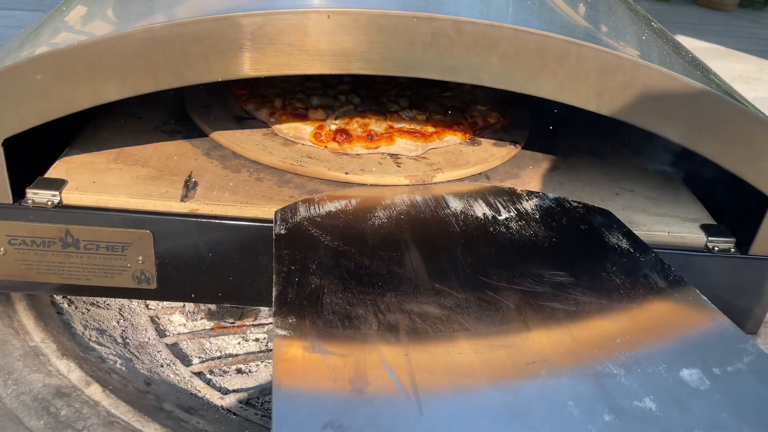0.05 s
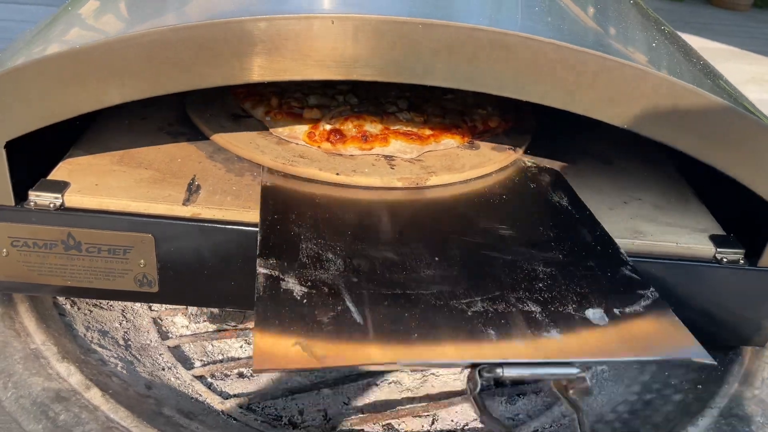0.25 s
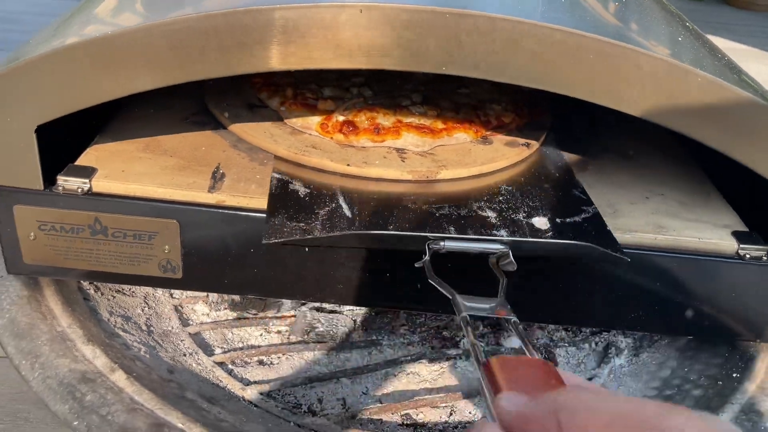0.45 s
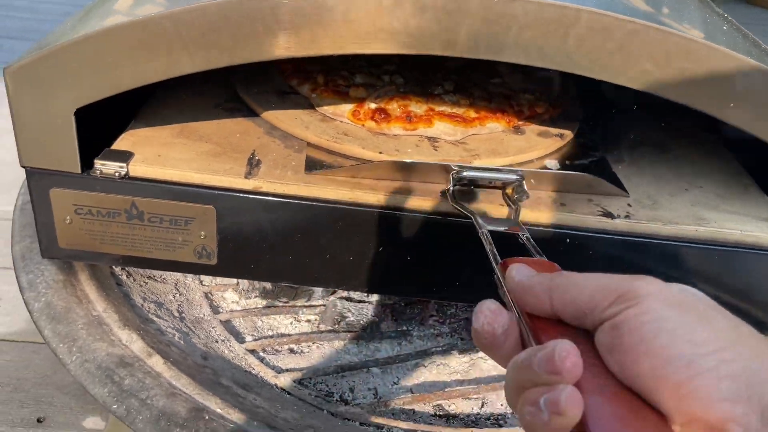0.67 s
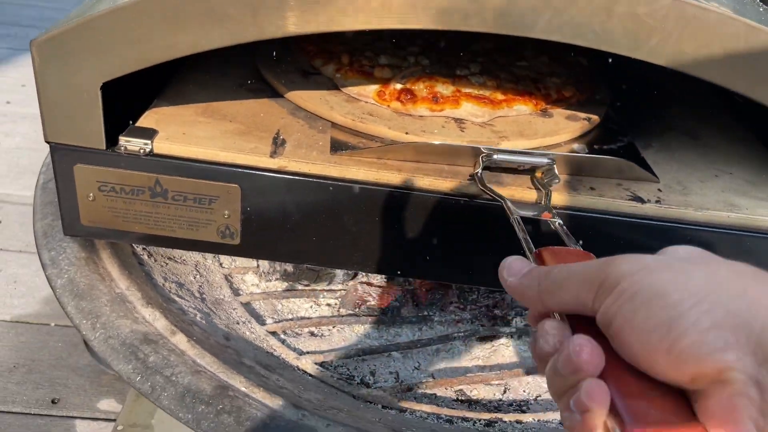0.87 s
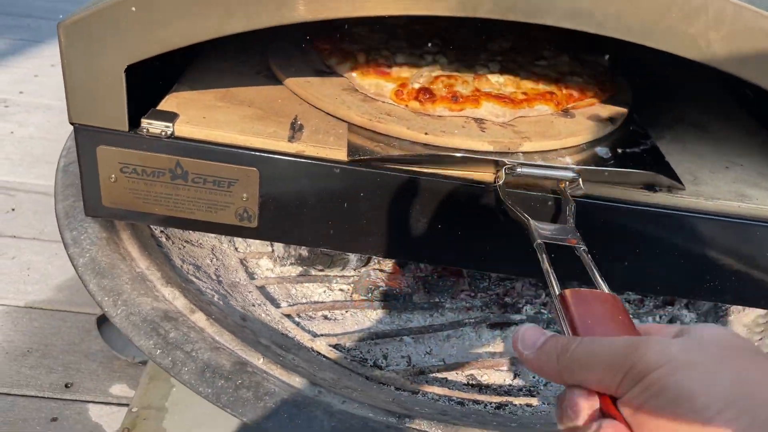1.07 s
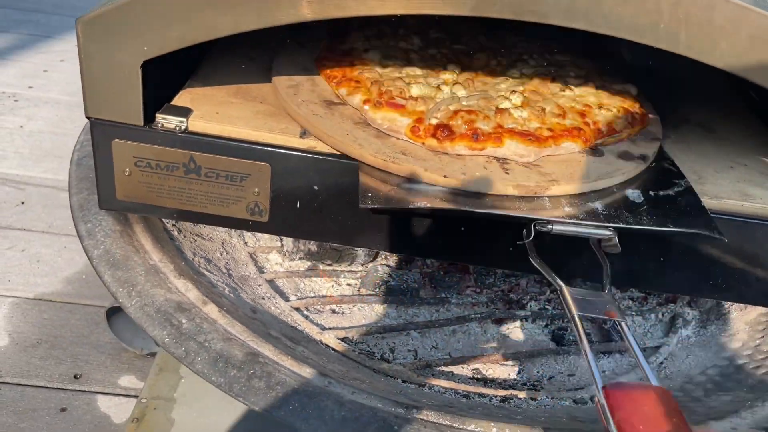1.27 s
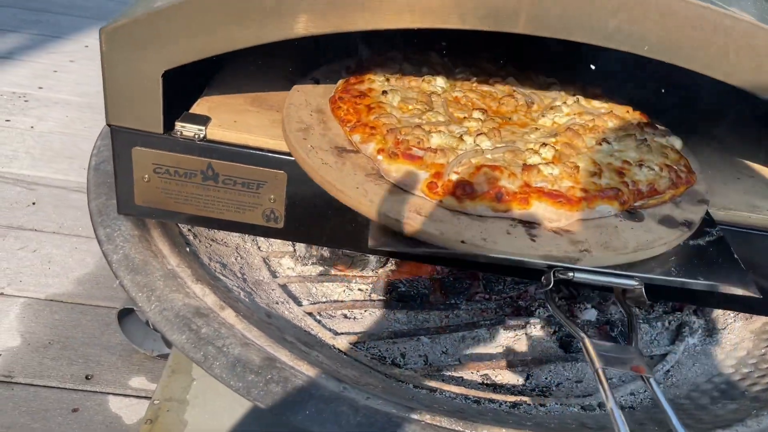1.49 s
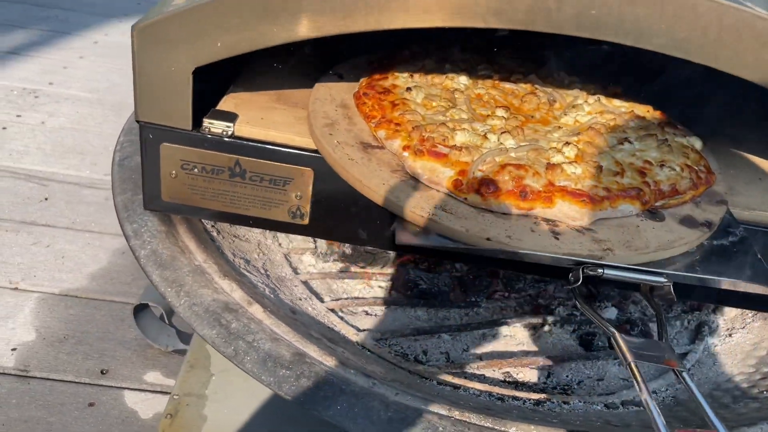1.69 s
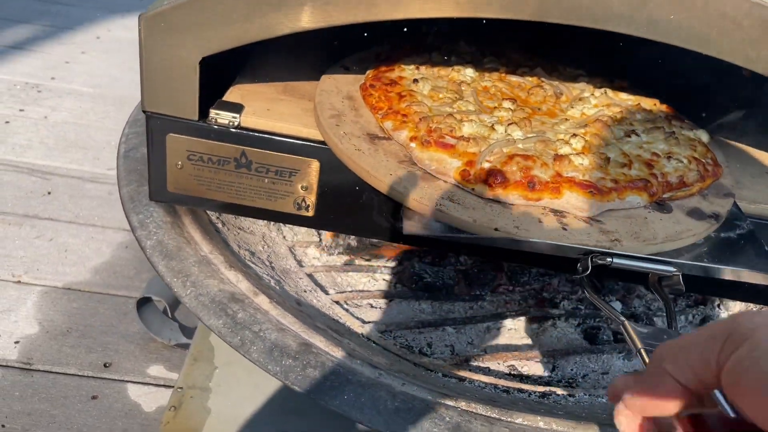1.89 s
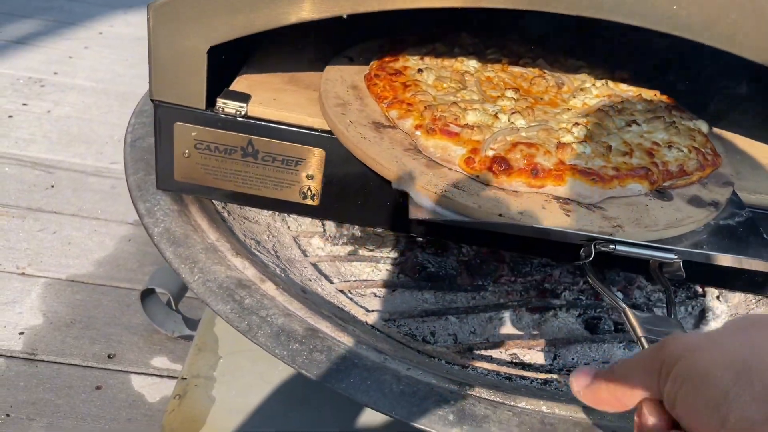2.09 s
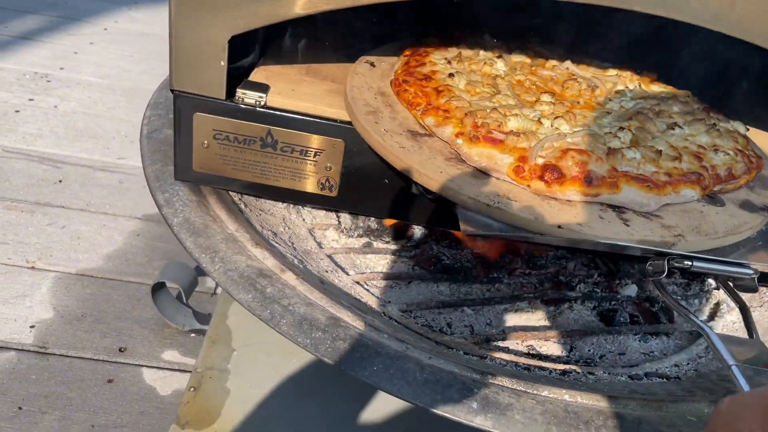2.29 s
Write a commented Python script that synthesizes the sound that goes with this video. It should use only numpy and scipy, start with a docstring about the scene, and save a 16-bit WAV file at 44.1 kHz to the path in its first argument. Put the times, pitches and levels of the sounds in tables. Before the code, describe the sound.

A metal peel scrapes into a pizza oven, close up, with a gritty hiss and brief squeaks. It bumps and judders on the oven floor around 0.5 seconds, then scrapes and squeaks again from 0.8 to 1.5. A sharp knock on the stone at 1.5 leaves the steel ringing faintly. A bright click comes at 1.9, then softer scraping and a small tap at 2.3. Burner and breeze rumble underneath.

```python
"""Pizza peel in a steel oven

A metal peel slides in under a pizza stone, outdoors and close up. Its blade hisses over grit, squeaks
as it catches, judders against the oven floor, knocks the stone and clicks once more. The steel shell
rings on over the low rumble of the burner and a light breeze."""
import sys
import numpy as np
from scipy import signal
from scipy.fft import rfft, irfft
from scipy.io import wavfile

SR = 44100
rng = np.random.default_rng(int(sys.argv[2]) if len(sys.argv) > 2 else 0)


def unload_wav(signal):
    """Save mono or channel-first audio to the path in sys.argv[1] as 16-bit WAV at rate SR, clipped to [-1, 1]."""
    wavfile.write(
        sys.argv[1],
        SR,
        np.round(np.clip(np.atleast_2d(signal).T, -1, 1) * 32767).astype(np.int16),
    )


N = 108045
T = np.arange(N) / SR
HZ = np.maximum(np.arange(N + 1) * SR / (2 * N), 1)

# Resonances of the oven body and of the blade. Each row: centre in Hz, width in Hz, prominence in dB.
BODY_PEAKS = [(113.4, 26, 7.6), (190.3, 3, 9.7), (258.4, 12.3, 9.25)]
BLADE_PEAKS = [(825, 34, 9.5), (1399, 63, 5.5), (1650, 31, 2.5), (1930, 36, -11), (3570, 63, -3)]
# Colour of the rattling steel shell. Each row: frequency in Hz, relative level in dB.
RATTLE_COLOUR = [(300, -8), (550, -0.5), (850, -2), (1600, -6.5), (1950, -20), (6000, -75)]


def undb(db):
    """Decibels to gain."""
    return 10 ** (np.asarray(db) / 20)


def unit(x):
    """Scale to rms 1."""
    return x / np.sqrt(np.mean(x ** 2))


def response(colour, peaks=()):
    """Gain over frequency, at rms 1: a broad colour with resonances on top."""
    hz, db = np.array(colour).T
    broad = undb(np.interp(np.log(HZ), np.log(hz), db))
    resonance = sum(undb(lift) ** 2 / (1 + (2 * (HZ - centre) / width) ** 2)
                    for centre, width, lift in peaks)
    return unit(broad * np.sqrt(1 + resonance))


def through(x, gain):
    """Minimum-phase filter with the given gain over frequency."""
    cepstrum = irfft(np.log(gain + 1e-9))
    cepstrum[1:N] *= 2
    cepstrum[N + 1:] = 0
    taps = irfft(np.exp(rfft(cepstrum)))[:N // 8]
    return signal.fftconvolve(x, taps[None], axes=1)[:, :N]


def walk(per_s):
    """A random drift with a spread near 1."""
    knots = rng.standard_normal(2048)
    return np.interp(T * per_s, np.arange(len(knots)), knots)


def spread(pair, side_db):
    """Stereo from two unrelated signals, used as mid and side."""
    return pair[0] + undb(side_db) * pair[1] * np.array([[1], [-1]])


def grains(per_s, scatter_db):
    """Two streams of tiny slips of random size."""
    hits = rng.random((2, N)) < per_s / SR
    signs = np.sign(rng.standard_normal((2, N)))
    return unit(hits * signs * undb(scatter_db * rng.standard_normal((2, N))))


def burst(t60, side_db):
    """Noise that dies away by 60 dB in t60 seconds."""
    return spread(grains(SR, scatter_db=1), side_db) * undb(-60 * T / t60)


def ring(modes):
    """Struck modes, alternating in sign."""
    return sum((-1) ** k * undb(db - 60 * T / t60) * np.sin(2 * np.pi * hz * T)
               for k, (hz, db, t60) in enumerate(modes))


def arch(length):
    """A half-sine swell lasting length seconds."""
    return np.sin(np.pi * np.minimum(T / length, 1))


def at(x, start):
    """Delay a sound to its start in seconds."""
    return np.pad(np.atleast_2d(x), ((0, 0), (int(start * SR), 0)))[:, :N]


def plate(spacing_hz, ripple_db):
    """The many close modes of sheet metal, as a ripple over frequency."""
    heights = rng.standard_normal(4096)
    return undb(ripple_db * np.interp(HZ / spacing_hz, np.arange(len(heights)), heights))


def strokes(rows, attack_s, release_s, rest_db):
    """One envelope per level column: strokes rise, hold and let go over the blade's resting contact."""
    power = undb(rest_db)[:, None] ** 2
    for start, length, *levels_db in rows:
        rise = (1 + np.tanh((T - start) / (2 * attack_s))) / 2
        fall = (1 + np.tanh((start + length - T) / (2 * release_s))) / 2
        power = power + (undb(levels_db)[:, None] * rise * fall) ** 2
    return np.sqrt(power)


def moving_contact(grit, gain, sets=7, shifts_per_s=16, contrast_db=12):
    """As the contact point travels over the blade, one set of its modes gives way to another."""
    shares = np.array([undb(contrast_db * walk(shifts_per_s)) for _ in range(sets)])
    shares = shares / np.sqrt(np.sum(shares ** 2, axis=0))
    blend = 0
    for k, share in enumerate(shares):
        modes = gain * plate(spacing_hz=55, ripple_db=4.5)
        slips = np.roll(grit, k * N // sets, axis=1)
        blend = blend + share * unit(through(slips, modes))
    return blend


def burner_and_breeze():
    """The burner rumbles in the oven body; a breeze brushes the microphone and dies down."""
    # Colours of the flame and the wind. Each row: frequency in Hz, relative level in dB.
    burner_colour = [(20, -29.5), (55, 1), (110, -7), (270, -9), (420, -15.5), (2000, -34.5), (16000, -104)]
    breeze_colour = [(20, -16), (55, 0), (100, -7), (1000, -70)]
    flame = spread(rng.standard_normal((2, N)), side_db=-10)
    air = spread(rng.standard_normal((2, N)), side_db=-8)
    burner = unit(through(flame, response(burner_colour, BODY_PEAKS)))
    breeze = unit(through(air, response(breeze_colour)))
    gust = undb(-41.5 - 6 * T + 2 * walk(per_s=9))  # falls 6 dB a second
    flicker = undb(-46.5 + walk(per_s=10.22))
    lull = undb(-9.5 * np.exp(-((T - 1.09) / 0.052) ** 2))  # the rumble dips briefly
    return lull * (flicker * burner + gust * breeze)


def bumps():
    """Soft pushes of the peel, a few low cycles each."""
    # Dull bumps. Each row: start in seconds, pitch in Hz, level in dB, length in seconds.
    pushes = [(0.221, 57, -33, 0.078), (0.286, 88.4, -37.5, 0.11), (0.467, 115.7, -18.5, 0.036),
              (1.237, 88.8, -25, 0.0205)]
    return sum(at(undb(db) * arch(length) * np.sin(2 * np.pi * hz * T), start)
               for start, hz, db, length in pushes)


def squeals():
    """Friction locks briefly onto one mode of the metal: a rough, wavering tone that sags."""
    # The blade's squeaks and groans. Each row: start and length in seconds, pitch in Hz, level in dB.
    catches = [(.15, 0.14, 888, -43.5), (0.225, 0.033, 1930, -40), (.275, 0.031, 2350, -41),
               (.55, 0.05, 297.6, -31), (0.783, 0.095, 1383, -45.5), (0.783, 0.078, 358.5, -39.5),
               (.925, 0.15, 825, -46.5), (1.052, 0.13, 870, -43.5), (1.152, .03, 2177, -42.5),
               (1.218, 0.034, 2710, -39), (1.223, 0.031, 1770, -44), (1.273, 0.057, 1650, -45),
               (1.371, .025, 1604, -42.5), (1.72, 0.099, 195.7, -38.5)]
    sag_per_s, waver_share, waver_cap_hz = 0.344, 0.045, 50
    tones = 0
    for start, length, hz, db in catches:
        waver = min(waver_share * hz, waver_cap_hz) * walk(per_s=303)
        pitch = hz * (1 - sag_per_s * (np.minimum(T, length) - length / 2)) + waver
        swell = arch(length) * undb(db + 2.9 * walk(per_s=131.4))
        tones = tones + at(swell * np.sin(2 * np.pi * np.cumsum(pitch) / SR), start)
    return tones


def clicks():
    """The blade's edge taps down: a hollow knock and a bright snap, echoing faintly in the oven mouth."""
    # Taps of the edge. Each row: start in seconds, then knock gain and snap gain in dB.
    taps = [(0.4614, -20.5, -33), (1.8863, -27.5, -9), (1.8973, -39, -25)]
    # Modes of the tapped blade. Each row: pitch in Hz, relative level in dB, T60 in seconds.
    edge_modes = [(253, -2, 0.076), (627, -1.5, 0.021), (1093, 0.5, 0.023)]
    # Colour of the snap. Each row: frequency in Hz, relative level in dB.
    snap_colour = [(70, -11), (250, 7.5), (1100, -3.5), (1700, -22.5), (4200, -13), (16000, -18.5)]
    spike = undb(17) * (T == 0)
    tail = 0.5 * burst(t60=0.028, side_db=-27)
    echo = undb(-25.5) * burst(t60=0.2, side_db=0)
    snap = through(spike + tail + echo, response(snap_colour)) * undb(-9)
    return sum(at(undb(knock_db) * ring(edge_modes) + undb(snap_db) * snap, start)
               for start, knock_db, snap_db in taps)


def knocks():
    """Each knock cracks, rings the stone briefly and leaves the steel shell ringing."""
    # The peel hits the stone. Each row: start in seconds, then gains of stone, crack and shell in dB.
    hits = [(1.466, -24.5, -3, -78), (1.4683, -11.5, -11.5, -40), (2.323, -47.5, -22, -80)]
    # Short modes of peel on stone, long modes of the shell.
    # Each row: pitch in Hz, relative level in dB, T60 in seconds.
    stone_modes = [(195, -6, 0.099), (387, -6.5, 0.11), (929, -2.5, 0.045), (1185, -10.5, 0.028),
                   (1580, -7.5, 0.039), (1995, -10.5, 0.078), (4565, -14, 0.049), (6580, -20.5, 0.04)]
    shell_modes = [(118.2, -1, 1.6), (188, -3.5, 4.1), (272.2, -8, 2.9), (364.5, -5.5, 1.6),
                   (508, -2.5, 1.07), (581, -3, 0.81), (803, -9, 1.6), (1029, -4.5, 1.3), (1339, -7.5, 1.5)]
    # Colour of the crack. Each row: frequency in Hz, relative level in dB.
    crack_colour = [(80, -22), (200, 4), (1500, 5.5), (4600, -6), (6500, -13), (15000, -24.5)]
    stone = ring(stone_modes)
    crack = through(burst(t60=0.057, side_db=-12), response(crack_colour)) * undb(-14)
    wash = through(burst(t60=1, side_db=-4.5), response(RATTLE_COLOUR)) * undb(3)
    shell = ring(shell_modes) + wash
    return sum(at(undb(stone_db) * stone + undb(crack_db) * crack + undb(shell_db) * shell, start)
               for start, stone_db, crack_db, shell_db in hits)


def drag():
    """The blade sticks and slips on the oven floor, shaking the body and rattling the shell."""
    # Drags on the floor. Each row: start and length in seconds, then judder and rattle gains in dB.
    drags = [(.39, 0.1, -37, -47), (.432, 0.046, -31, -31), (.464, 0.019, -22.5, -32.5),
             (.5, 0.18, -39, -44), (.552, 0.029, -29.5, -53), (.79, 0.089, -48, -44),
             (1.09, 0.073, -44.5, -50), (1.72, 0.21, -49, -56)]
    # Colour of the low judder. Each row: frequency in Hz, relative level in dB.
    judder_colour = [(60, -16), (130, -0.5), (270, -1), (600, -8.5), (1500, -44)]
    slips = grains(per_s=700, scatter_db=2)
    judder_force, rattle_force = strokes(drags, attack_s=0.0043, release_s=0.024, rest_db=(-60, -60))
    sheet = unit(response(RATTLE_COLOUR, BLADE_PEAKS) * plate(spacing_hz=18, ripple_db=5))
    judder = through(spread(slips, side_db=-14) * judder_force, response(judder_colour, BODY_PEAKS))
    rattle = through(spread(slips, side_db=-5) * rattle_force, sheet)
    return judder * undb(4) + rattle * undb(-0.5)


def slide():
    """Grit slips under the moving blade and rings it, while the hand's pressure wavers."""
    # The blade pushes in, draws the stone out and settles.
    # Each row: start and length in seconds, then grind and hiss gains in dB.
    slides = [(.04, 0.063, -58.5, -61), (.105, 0.19, -47.5, -52), (.19, 0.21, -40.5, -51),
              (.38, 0.16, -44, -58.5), (.535, 0.075, -44, -54.5), (.61, 0.032, -49, -65),
              (.93, 0.4, -51, -63.5), (1.02, 0.13, -46.5, -59), (1.15, 0.11, -47.5, -51),
              (1.218, 0.036, -43, -54), (1.275, 0.14, -44, -49), (1.41, 0.13, -45, -57),
              (1.52, .11, -52, -70), (1.91, 0.081, -57, -64), (2.11, 1, -52, -60.5)]
    # Colours of the coarse grind and the fine hiss. Each row: frequency in Hz, relative level in dB.
    grind_colour = [(200, -8), (650, 0), (850, -1), (1700, 1.5), (2300, 1.5), (6500, -3), (9000, -40.5),
                    (16000, -57)]
    hiss_colour = [(3000, -22), (8000, 0), (13300, -1), (16000, -18)]
    grit_per_s = 14000
    coarse_grit = spread(grains(grit_per_s, scatter_db=5), side_db=-7)
    grind = moving_contact(coarse_grit, response(grind_colour, BLADE_PEAKS)) * undb(1.5)
    fine_grit = spread(grains(grit_per_s, scatter_db=3), side_db=-19)
    hiss = moving_contact(fine_grit, response(hiss_colour)) * undb(7)
    grind_force, hiss_force = strokes(slides, attack_s=0.013, release_s=0.007, rest_db=(-59.5, -72))
    pressure = undb(0.95 * walk(per_s=80))
    return pressure * (grind * grind_force + hiss * hiss_force)


def scene():
    """The peel works at the oven mouth over a bed of burner and breeze."""
    return slide() + drag() + squeals() + knocks() + clicks() + bumps() + burner_and_breeze()


def record(dry):
    """The left port is a little louder, the treble reaches the right one first; the top is cut."""
    # The two microphone ports. Each row: frequency in Hz, left's lead in radians, left's excess in dB.
    port_balance = [(0, 0, .5), (1000, 0, 2), (5600, 0, 2.2), (8200, -3.14, 0), (11300, -6.28, 0),
                    (22050, -15.5, 0)]
    top_hz = 15850
    hz, radians, db = np.array(port_balance).T
    half = np.array([[0.5], [-0.5]])
    gain = undb(np.interp(HZ, hz, db) * half)
    phase = np.interp(HZ, hz, radians) * half
    heard = irfft(rfft(dry, 2 * N) * gain * np.exp(1j * phase))[:, :N]
    return signal.sosfilt(signal.ellip(10, 0.2, 80, top_hz, fs=SR, output="sos"), heard)


dry = scene()
out = record(dry)
unload_wav(out)
```